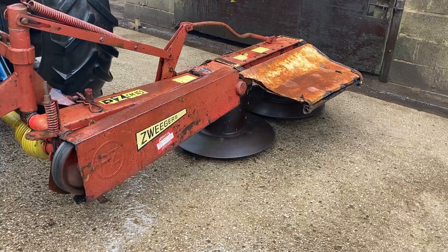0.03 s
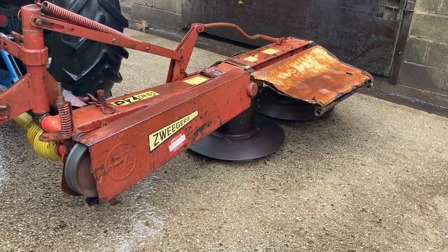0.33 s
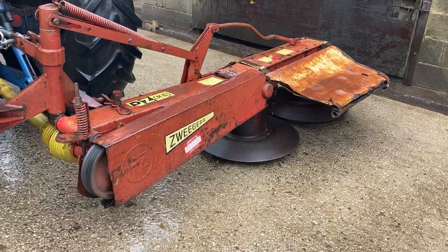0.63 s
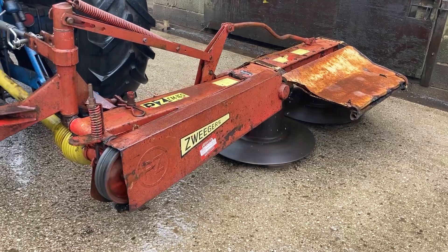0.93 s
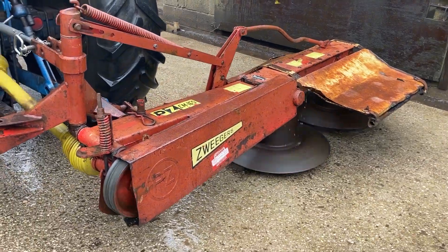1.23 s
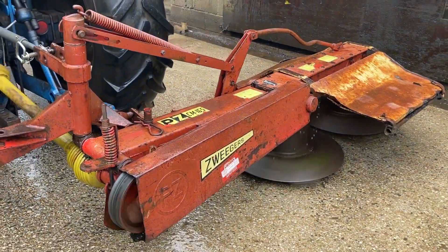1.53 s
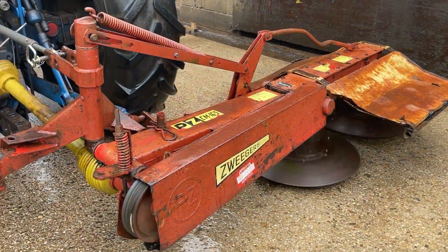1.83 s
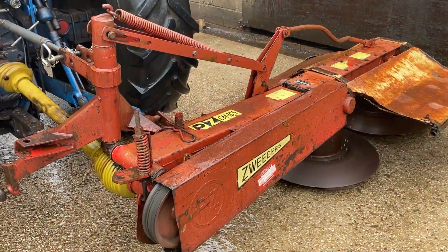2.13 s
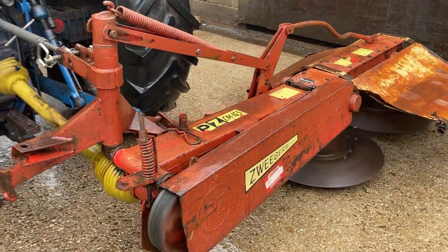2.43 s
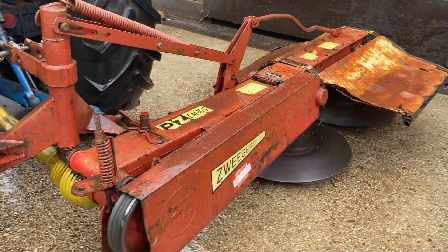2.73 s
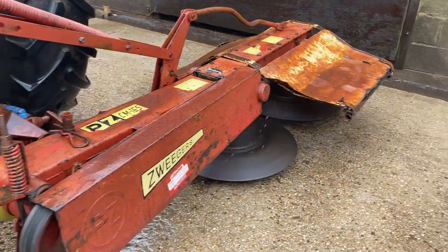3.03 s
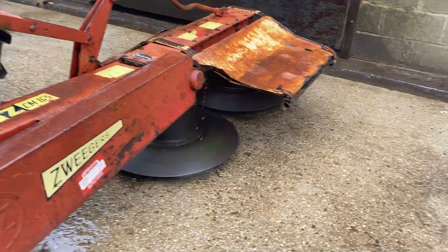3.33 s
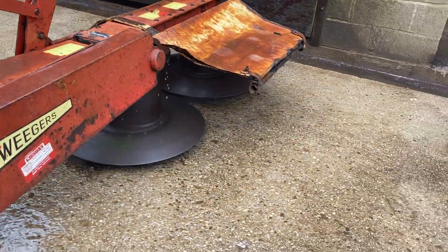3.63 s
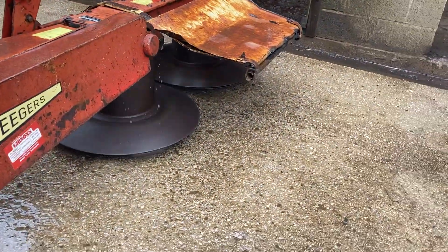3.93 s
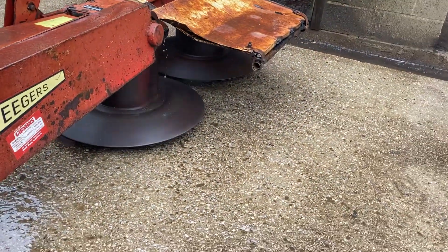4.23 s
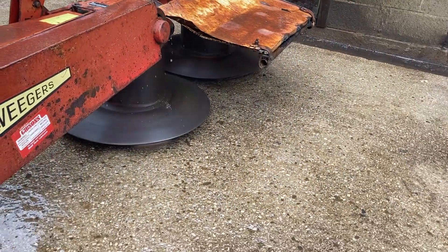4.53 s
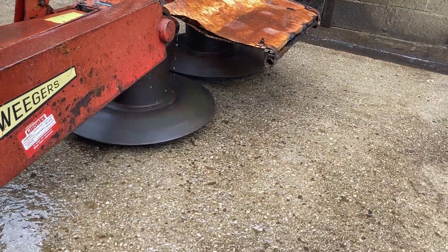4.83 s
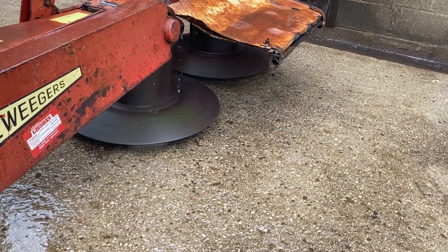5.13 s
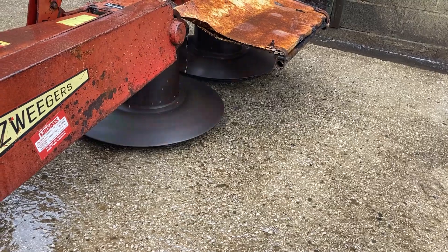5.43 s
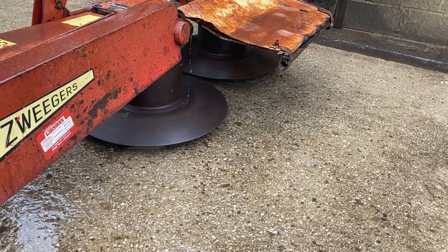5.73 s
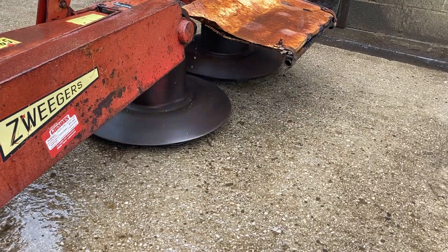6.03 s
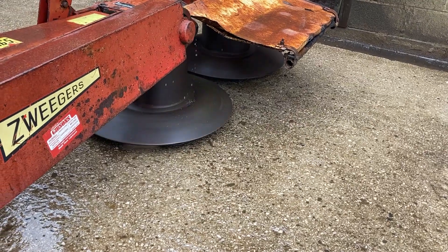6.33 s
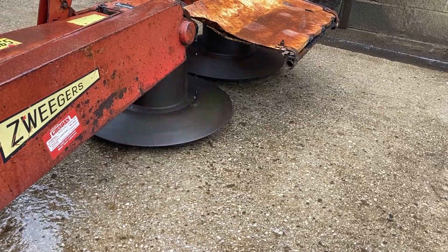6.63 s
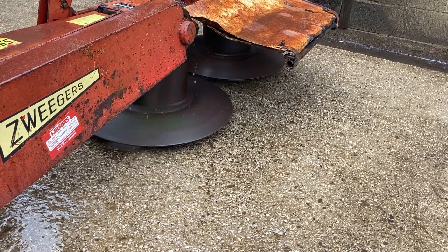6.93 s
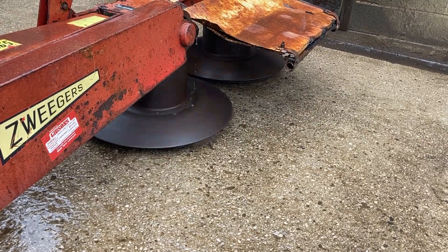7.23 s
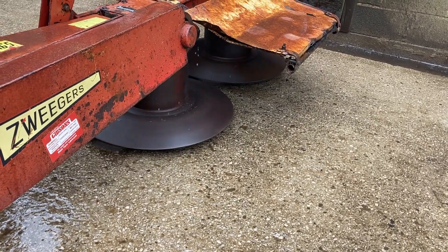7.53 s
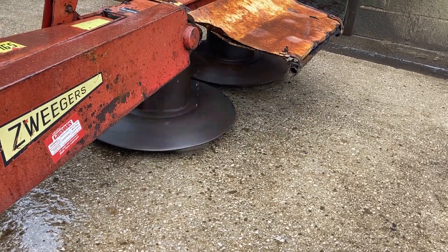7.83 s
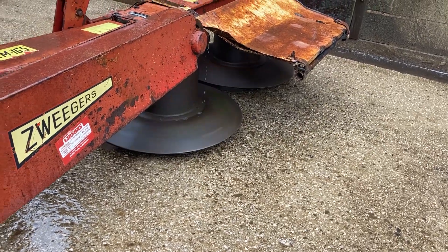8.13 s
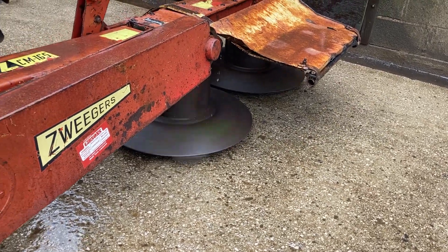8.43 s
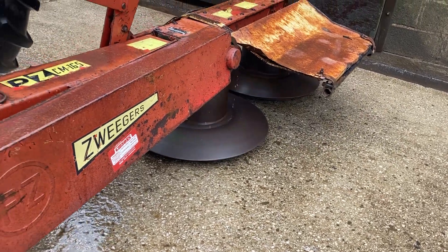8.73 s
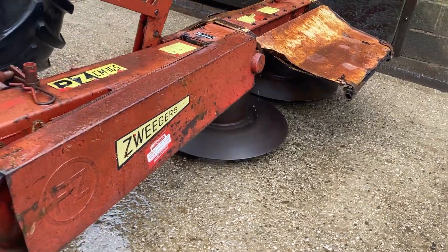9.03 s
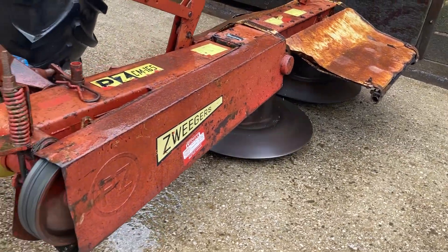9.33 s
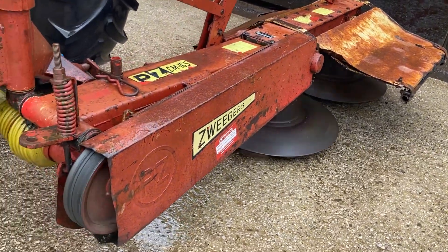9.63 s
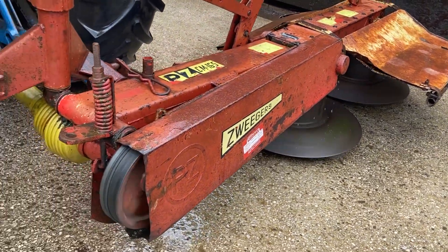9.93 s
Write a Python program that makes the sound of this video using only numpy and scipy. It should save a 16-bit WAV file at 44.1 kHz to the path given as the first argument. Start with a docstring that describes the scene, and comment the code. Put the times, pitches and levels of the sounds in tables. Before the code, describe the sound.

A tractor diesel drones steadily while a drum mower spins empty, its gears clattering and whining and its belt ticking.

```python
"""A concrete yard between barns: a tractor at steady part throttle spins an empty drum mower,
a step from a hand-held phone. The diesel knocks, the exhaust drones and loose steel clinks.
Unloaded gears clatter and whine, the sheet-steel hood booms and the belt guard sings.
The drive belt hisses, and its worn spot scuffs and ticks once a lap.
A light breeze buffets the microphones; the barn walls scatter the sound."""
import sys
import numpy as np
from scipy import signal
from scipy.fft import rfft, irfft
from scipy.io import wavfile
from scipy.ndimage import uniform_filter1d

SR = 44100
rng = np.random.default_rng(int(sys.argv[2]) if len(sys.argv) > 2 else 0)


def put_to_file(sound):
    """Save the sound as 16-bit audio at rate SR, in the file named by the first command-line argument."""
    columns = np.atleast_2d(sound).T  # one column per channel
    safe = np.clip(columns, -1, 1)
    whole_steps = np.round(safe * 32767)
    wavfile.write(sys.argv[1], SR, whole_steps.astype(np.int16))


N = 440118
T = np.arange(N) / SR
HZ = np.maximum(np.arange(N // 2 + 1) * SR / N, 1)
BELT_LAP_S, BELT_FIRST_S = 0.169, 0.153
RISE_S = 0.003  # a tick or clink builds up over a few quick contacts


def amp(db):
    """Decibels to gain."""
    return 10 ** (np.asarray(db) / 20)


def unit(x):
    """Scale to rms 1."""
    return x / np.sqrt(np.mean(x ** 2))


def curves(table):
    """Each column of a timed table at every sample."""
    s, *columns = np.transpose(table)
    return [np.interp(T, s, c) for c in columns]


def across(points):
    """A (frequency, value) table at every frequency."""
    hz, value = np.transpose(points)
    return np.interp(np.log(HZ), np.log(hz), value)


def colour(x, spectrum):
    """Shape x with an EQ curve; rms 1."""
    return unit(irfft(rfft(x) * amp(across(spectrum)), N))


def ring(x, modes):
    """Drive steep-skirted resonances with x; the slow level stays at rms 1."""
    response = sum(amp(db) / (1 + 1j * (HZ ** 2 - hz ** 2) / (2 * width * HZ)) ** 2
                   for hz, width, db in modes)
    y = irfft(rfft(x) * response, N)
    return y / np.sqrt(uniform_filter1d(y ** 2, size=7000))


def wander(hz):
    """Smooth random motion of rms 1, rolling off above hz."""
    return unit(irfft(rfft(rng.standard_normal(N)) / (1 + (HZ / hz) ** 4), N))


def surges(table):
    """Gain that swells and sinks again at each row."""
    return sum(amp(db) * np.exp(-np.minimum(((T - s) / length) ** 2, 20)) for s, length, db in table)


def lap_swell(delay_s, width_s):
    """A bump from 0 to 1 on each lap of the belt, delay_s after its tick."""
    offset = (T - BELT_FIRST_S - delay_s + BELT_LAP_S / 2) % BELT_LAP_S - BELT_LAP_S / 2
    return np.exp(-0.5 * (offset / width_s) ** 2)


def pulses(times, sizes):
    """One-sample blows at the given times."""
    return np.bincount(np.clip(np.asarray(times) * SR, 0, N).astype(int), sizes, N + 1)[:N]


def smear(x, t60):
    """Every blow in x rings on in many dense modes; the tails wrap round to the start."""
    t = T[:int(t60 * SR) + 2]
    tail = rng.standard_normal(len(t)) * np.exp(-np.log(1000) * t / t60)
    return irfft(rfft(x) * rfft(tail / np.linalg.norm(tail), N), N)


def rattle(rate, spread_db):
    """Random small impacts of uneven force, rate a second."""
    hits = (rng.random(N) < rate / SR) * rng.choice([-1, 1], N)
    return unit(hits * amp(spread_db * rng.standard_normal(N)))


def sing(shaft_s, hz, slip):
    """A shaft-driven tone of rms 1 whose phase slips to and fro by slip radians rms."""
    return np.sqrt(2) * np.sin(2 * np.pi * hz * shaft_s + slip * wander(9.2))


def breeze(width, rise_s, fall_s):
    """Low buffeting, partly shared by the two microphones; each gust rises quickly and dies away."""
    # gusts: (peak time [s], level [dB])
    gusts = [(0.1, -30), (0.8, -42), (1.88, -35), (2.64, -31.5), (3.2, -33), (5.96, -36), (6.6, -39),
             (7.78, -35)]
    # wind rumble: (frequency [Hz], level [dB])
    wind_eq = [(15, -20), (30, -25), (50, -2.5), (80, -1.5), (130, -4), (300, -14.5), (1000, -71)]
    lull = amp(-44.5)
    gusting = sum(amp(db) * np.exp(np.minimum((T - s) / rise_s, (s - T) / fall_s)) for s, db in gusts)
    shared = colour(rng.standard_normal(N), wind_eq)
    apart = np.array([colour(rng.standard_normal(N), wind_eq) for _ in range(2)])
    return (lull + gusting) * (shared + width * apart)


def yard(x, wall_t60):
    """Direct sound at two microphones, plus wall scatter that shifts as the phone moves."""
    # sound arriving off the walls: (frequency [Hz], share of power [0-1])
    wall_share = [(60, 0.13), (250, 0), (600, 0.11), (1100, 0.18), (2000, 0.71), (3500, 0.71), (6000, 0.8),
                  (7000, 0)]
    # the rasp's band leans left: (frequency [Hz], left minus right [dB])
    lean = [(900, 0), (2400, 3), (8000, 0.7)]
    # lows and mids reach the left microphone first, treble the right
    left_lead_s, right_lead_s, split_hz = 0.0001, 0.000236, 2037
    cycles = right_lead_s * np.maximum(HZ - split_hz, 0) - left_lead_s * np.minimum(HZ, split_hz)
    share = np.clip(across(wall_share), 0, 1)
    direct = np.sqrt(1 - share) * rfft(x)
    sway, channels = wander(5.5), []
    for shift, side in ((1, 0.5), (np.exp(2j * np.pi * cycles), -0.5)):
        paths = np.array([np.roll(sway, k) for k in rng.integers(0, N, size=5)])
        scatter = sum(weight * smear(x, wall_t60) for weight in paths / np.linalg.norm(paths, axis=0))
        spectrum = direct * shift + np.sqrt(share) * rfft(scatter)
        channels.append(irfft(spectrum * amp(side * across(lean)), N))
    return np.array(channels)


def clinks(t60, faint_count, faint_db):
    """Loose steel parts knock together; every clink rings its own cluster of modes."""
    # featured clinks: (time [s], level [dB])
    accents = [(0.658, -35), (1.7, -32), (2.1, -30), (2.21, -34), (3.868, -36), (7.416, -40), (8.934, -33)]
    faint = [(u * T[-1], faint_db) for u in rng.random(faint_count)]
    t = T[:SR // 10]
    envelope = np.minimum(t / RISE_S, 1) * np.exp(-np.log(1000) * t / t60)
    out = np.zeros((2, N + len(t)))
    for s, db in accents + faint:
        hz = rng.uniform(2520, 4700, size=(9, 1))
        phase = 2 * np.pi * rng.random((2, 9, 1))
        modes = unit(np.sin(2 * np.pi * hz * t + phase).sum(axis=1))
        start = int(s * SR)
        out[:, start:start + len(t)] += amp(db) * modes * envelope
    return out[:, :N]


def pulley():
    """The belt pulley rings as the phone comes back to it."""
    # swell of the ring: (time [s], half length [s], peak [dB])
    swell = [(9.1, .75, -45)]
    # pulley resonances: (frequency [Hz], width [Hz], level [dB])
    modes = [(2180, 70, 2), (4380, 40, -2), (6410, 55, -7)]
    return surges(swell) * ring(rng.standard_normal(N), modes)


def exhaust(shaft_s):
    """The exhaust drones: two beating engine tones inside a rough pipe resonance."""
    # drone along the phone's walk: (time [s], level [dB])
    fader = [(1.1, -33.5), (1.35, -37.5), (1.8, -31.5), (3.3, -31.5), (3.9, -29), (4.9, -32), (6.6, -33.5),
             (8.1, -29.5), (10, -33)]
    # pipe resonance: (frequency [Hz], width [Hz], level [dB])
    modes = [(145.3, 14.7, 0)]
    beat = unit(sum(sing(shaft_s, hz, slip=0.55) for hz in (141.1, 150)))
    pipe = ring(rattle(rate=400, spread_db=3.5), modes)
    return amp(curves(fader)[0]) * (pipe + amp(-3) * beat)


def diesel(shaft_s, cycle_hz, spread_db, jitter_s, ring_t60):
    """The cylinders fire in turn, each with its own force and knock; no two firings are quite alike."""
    # each cylinder in firing order: (force [dB])
    cylinders = [0.75, -1.5, 0.00046, 0.16]
    # diesel knock: (frequency [Hz], level [dB])
    knock_eq = [(30, -30), (80, -14), (140, -4.5), (220, 5), (330, -8), (500, 2), (900, -1), (1400, -10),
                (2000, -23.5), (8000, -46)]
    count = len(cylinders)
    firing_hz = cycle_hz * count
    firings = np.interp(np.arange(shaft_s[-1] * firing_hz) / firing_hz, shaft_s, T)
    late, force = rng.standard_normal((len(firings), 2)).T
    times, sizes = firings + jitter_s * late, amp(spread_db * force)
    knocks = sum(amp(db) * smear(pulses(times[k::count], sizes[k::count]), ring_t60)
                 for k, db in enumerate(cylinders))
    return colour(knocks, knock_eq)


def belt_rub(level_db):
    """The belt hisses over chattering pulleys; a worn spot scuffs each lap, then brushes the far one."""
    # running hiss: (frequency [Hz], level [dB])
    hiss_eq = [(2000, -43), (5000, -3), (7200, 0.5), (8400, 2.5), (10500, 6), (12500, -4), (15500, -18)]
    # scuff and pulley chatter: (frequency [Hz], level [dB])
    scuff_eq = [(1500, -26), (4000, 9.5), (6000, 2.5), (8000, -10), (11300, 1.5), (13000, 0), (16000, -14)]
    hiss = colour(rattle(rate=13000, spread_db=-1.5), hiss_eq) * amp(1.3 * wander(20))
    hiss *= 1 + 0.45 * lap_swell(delay_s=0.063, width_s=0.032)
    scuff = colour(rattle(rate=5000, spread_db=3.5), scuff_eq) * amp(1.6 * wander(2.4))
    scuff *= lap_swell(delay_s=0, width_s=0.0047)
    chatter = colour(smear(rattle(rate=290, spread_db=4), t60=0.01), scuff_eq)
    return amp(level_db) * (amp(-8.5) * hiss + amp(3.5) * scuff + amp(-9.5) * chatter)


def belt_ticks(level_db, t60):
    """The belt's worn spot ticks once a lap, and on some laps snaps harder."""
    # extra snaps: (time [s], level [dB])
    snaps = [(0.1502, -42), (0.6576, -38), (1.1659, -32.5), (1.6748, -38), (2.014, -38), (2.1816, -32.5),
             (2.6884, -31.5), (2.859, -27), (4.884, -36), (5.3924, -35)]
    # bright tick: (frequency [Hz], level [dB])
    tick_eq = [(2000, -22), (4500, -8), (8000, 2), (11300, 5), (16000, -22)]
    laps = np.arange(BELT_FIRST_S, T[-1], BELT_LAP_S)
    late, force = rng.standard_normal((len(laps), 2)).T
    snap_s, snap_db = np.transpose(snaps)
    hits = pulses(laps + 0.0017 * late, amp(level_db + 2 * force)) + pulses(snap_s, amp(snap_db))
    t = T[:SR // 20]
    envelope = np.minimum(t / RISE_S, 1) * np.exp(-np.log(1000) * t / t60)
    return signal.oaconvolve(hits, envelope)[:N] * colour(rng.standard_normal(N), tick_eq)


def whine(shaft_s, gain_db, waver_db, slip):
    """Shaft and gear tones follow the engine speed, wavering with the load."""
    # tones of engine, drums and gears: (frequency [Hz], level [dB])
    partials = [(55.9, -47.5), (272.5, -39.5), (283.5, -43), (343.9, -41), (399, -40.5), (426.5, -39.5),
                (554.5, -34), (648.5, -44), (732.8, -36), (902.5, -44), (1060, -41.5)]
    # the gears whine up under a passing load: (time [s], half length [s], peak [dB])
    loads = [(0.73, 0.04, -21), (1.68, 0.082, -22.5), (4.25, 0.053, -23), (6.37, 0.025, -19),
             (7.11, 0.038, -19)]
    sway, drift = wander(6.2), wander(7.0)
    tones = np.zeros(N)
    for (hz, db), shift in zip(partials, rng.integers(0, N, len(partials))):
        phase = 2 * np.pi * hz * shaft_s + slip * np.roll(drift, shift)
        tones += amp(db + waver_db * np.roll(sway, shift)) * np.sqrt(2) * np.sin(phase)
    return amp(gain_db) * tones + surges(loads) * sing(shaft_s, hz=725, slip=1.74)


def gearbox(clatter_db, frame_db, rasp_db):
    """Unloaded gears rattle in their backlash: low clatter, a ringing frame, a rasp that rings steel."""
    # gear clatter and rasp: (frequency [Hz], level [dB])
    clatter_eq = [(40, -45), (110, -5), (200, 2), (430, 6), (620, -2), (800, -1), (1100, -4), (1450, -10),
                  (1850, -15), (4000, -37)]
    rasp_eq = [(700, -4.5), (1500, 4), (1850, 0), (2250, 0), (2900, -7.5), (3800, -11), (4500, -12),
               (5600, -16.5), (9000, -17.5), (16000, -26)]
    # resonances of the frame and of bright steel: (frequency [Hz], width [Hz], level [dB])
    frame_modes = [(500, 12.5, -5.5), (646, 16, -8), (696, 25, 2), (752.6, 34, 0.5), (833, 33, -3.5),
                   (1021, 62, -7), (1117, 17, -4.5), (1336, 26, -8.5)]
    steel_modes = [(2200, 200, -4.5), (3020, 280, -8.5), (3540, 43, -5.5), (4374, 55, -8), (7560, 53, -16),
                   (8290, 120, -12.5)]
    clatter = colour(rattle(rate=1500, spread_db=2) * amp(0.85 * wander(52)), clatter_eq)
    frame = ring(rattle(rate=900, spread_db=4), frame_modes)
    rasp = colour(rattle(rate=9000, spread_db=3), rasp_eq)
    rasp += amp(-10.5) * ring(rattle(rate=1600, spread_db=1), steel_modes)
    rasp *= amp(1.82 * wander(44))
    rasp *= 1 + 0.3 * lap_swell(delay_s=0.0072, width_s=0.015)  # each tug of the belt jolts the gears
    return amp(clatter_db) * clatter + amp(frame_db) * frame + amp(rasp_db) * rasp


def hood(shaft_s, level_db, throb_db):
    """The sheet-steel hood booms under the rattle."""
    # hood resonance: (frequency [Hz], width [Hz], level [dB])
    modes = [(278.2, 22.2, 0)]
    # the boom wells up: (time [s], half length [s], peak [dB])
    booms = [(2.5, .04, -25), (3.26, 0.041, -23), (4.05, 0.055, -25), (5.08, 0.039, -21),
             (6.06, 0.037, -21.5), (7.13, 0.032, -21), (7.35, 0.03, -18), (7.5, 0.051, -21),
             (7.78, 0.08, -21.5)]
    body = amp(level_db + throb_db * wander(3.2)) * ring(rattle(rate=600, spread_db=4), modes)
    return body + surges(booms) * sing(shaft_s, hz=272.6, slip=0.75)


def belt_guard(shaft_s, mesh_hz, throb_db):
    """The guard sings with the gear mesh, close to its own pitch, and growls when it shakes loose."""
    # the song between surges: (time [s], level [dB])
    fader = [(0, -23.5), (0.5, -24.5), (1.0, -17), (1.5, -21), (2.3, -20), (3.8, -21.5), (5.2, -21),
             (7.3, -22.5), (10, -27)]
    # surges of the mesh tone, the growl and the octave ring: (time [s], half length [s], peak [dB])
    mesh_surges = [(0.14, 0.038, -17.5), (0.32, .04, -30), (1.22, 0.024, -14.5), (1.35, 0.024, -25),
                   (1.48, 0.026, -29), (2.08, 0.027, -24), (2.39, 0.032, -22), (2.89, 0.099, -25),
                   (4.12, 0.046, -29), (4.25, 0.052, -20), (4.49, 0.03, -23), (4.97, .04, -22),
                   (5.37, 0.041, -29), (5.2, 0.052, -20), (6.01, 0.043, -22.5), (6.88, 0.036, -21),
                   (8.46, 0.02, -24), (8.97, 0.022, -22), (9.81, 0.041, -21)]
    growl_surges = [(1.35, 0.9, -23.5)]
    octave_surges = [(0.5, 0.24, -30.5), (1.1, 0.32, -28.5)]
    # resonances of the song and the broader growl: (frequency [Hz], width [Hz], level [dB])
    song_modes = [(539, 22, 5), (558, 25, 1.5), (583, 47, -21), (1133, 40, -3)]
    growl_modes = [(563, 46, 0)]
    level_db = curves(fader)[0]
    mesh = (amp(level_db - 10) + surges(mesh_surges)) * sing(shaft_s, mesh_hz, slip=1.45)
    growl = surges(growl_surges) * ring(rattle(rate=1000, spread_db=1), growl_modes)
    song = amp(level_db - 6.5 + throb_db * wander(7.5)) * ring(rattle(rate=600, spread_db=3), song_modes)
    octave = surges(octave_surges) * sing(shaft_s, hz=1117, slip=1.36)
    return song + mesh + growl + octave


def scene():
    """Tractor and mower run at a slightly wandering speed; the phone's walk shifts the mix."""
    # the walk: (time [s], place [0 hitch to 1 drums], engine distance [m], belt distance [m])
    path = [(0, 0.16, 2.15, 1.2), (0.7, 0.28, 3.36, 1.02), (2.4, .2, 2.07, 0.85), (3.3, 0.74, 3.2, 0.92),
            (4.1, 0.89, 3.2, 0.94), (5.8, 0.89, 9.4, 1.06), (7.6, 0.84, 4.7, 1.07), (9.2, 0.69, 8, 1.03),
            (10, 0.65, 6.1, 1.07)]
    # the machine pans as the phone turns: (time [s], left minus right [dB])
    facing = [(0.06, -2.0), (0.56, -1.0), (1.27, -2.5), (1.96, -2.5), (3.46, 0.0), (8.43, 0.0),
              (9.98, -1.5)]
    place, engine_m, belt_m = curves(path)
    belt_gain_db = -20 * np.log10(belt_m)
    # the drum end radiates these parts, so they grow towards it
    clatter_db, frame_db, hood_db = -28 + 7 * place, -30.5 + 10 * place, -33 + 6.5 * place
    whine_db = 0.5 * (clatter_db - clatter_db.mean())  # partly radiated by the same frame
    shaft_s = np.cumsum(1 + 0.001146 * wander(0.6)) / SR  # running time of the shafts
    knock = diesel(shaft_s, cycle_hz=13.755, spread_db=4, jitter_s=0.00021, ring_t60=0.21)
    mower = hood(shaft_s, hood_db, throb_db=0.55) + belt_guard(shaft_s, mesh_hz=548.6, throb_db=0.55)
    mower += gearbox(clatter_db, frame_db, rasp_db=-31 + belt_gain_db) + pulley()
    mower += belt_rub(level_db=-36 + belt_gain_db) + belt_ticks(level_db=-38, t60=0.065)
    mower += whine(shaft_s, whine_db, waver_db=4, slip=0.91)
    tractor = amp(-14) / engine_m * knock + exhaust(shaft_s)
    machine = yard(tractor + mower, wall_t60=0.68) + clinks(t60=0.18, faint_count=70, faint_db=-38.5)
    pan = amp(curves(facing)[0] * np.array([[0.5], [-0.5]]))
    return machine * pan + breeze(width=0.51, rise_s=0.064, fall_s=0.35)


def record(dry):
    """The phone opens its input after a moment and cuts the top."""
    start_s, fade_s, top_hz = 0.035, 0.014, 15850
    opened = np.clip((T - start_s) / fade_s, 0, 1)
    return signal.sosfilt(signal.ellip(10, 0.2, 90, top_hz, fs=SR, output="sos"), dry * opened)


dry = scene()
out = record(dry)
put_to_file(out)
```